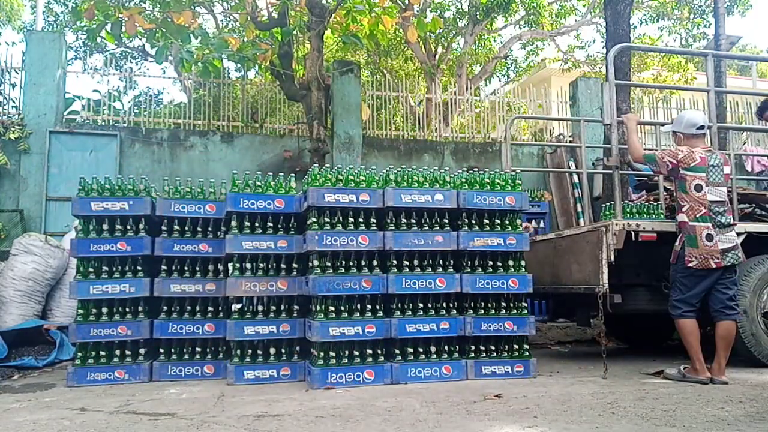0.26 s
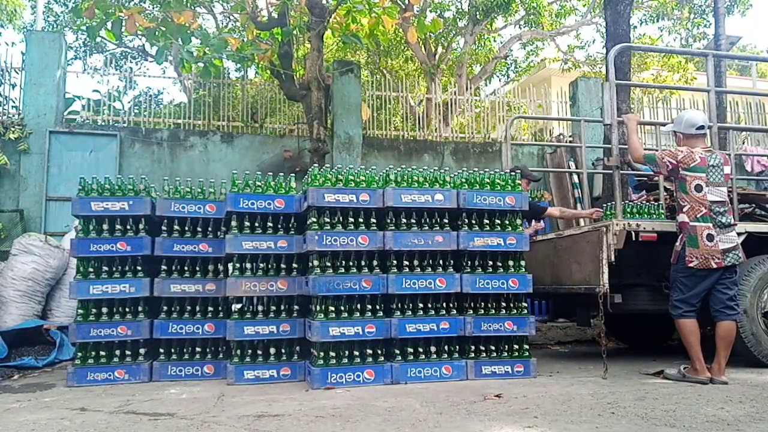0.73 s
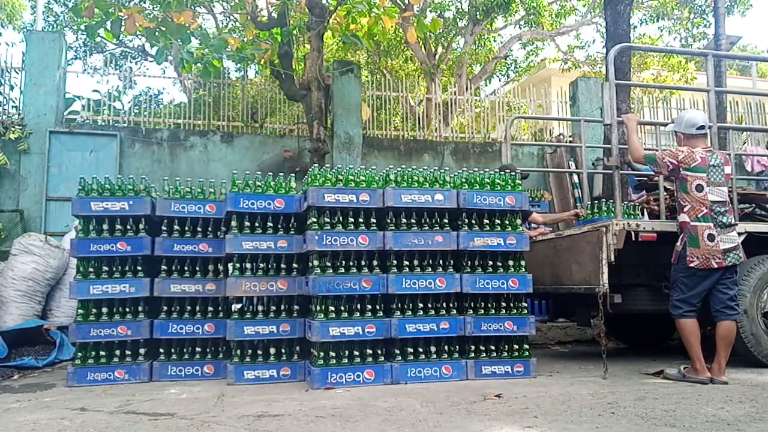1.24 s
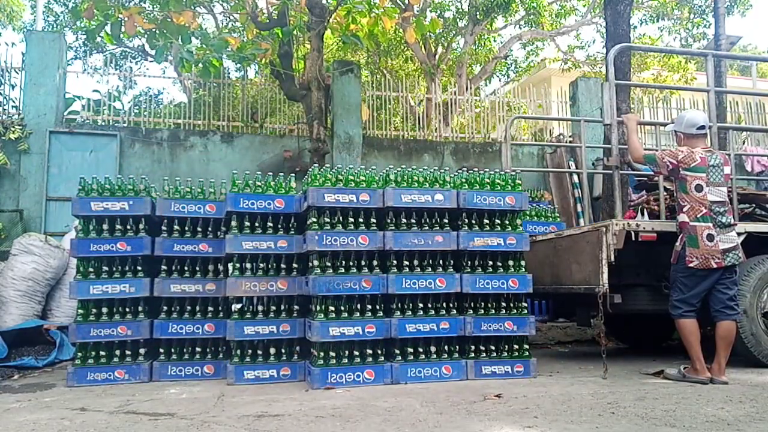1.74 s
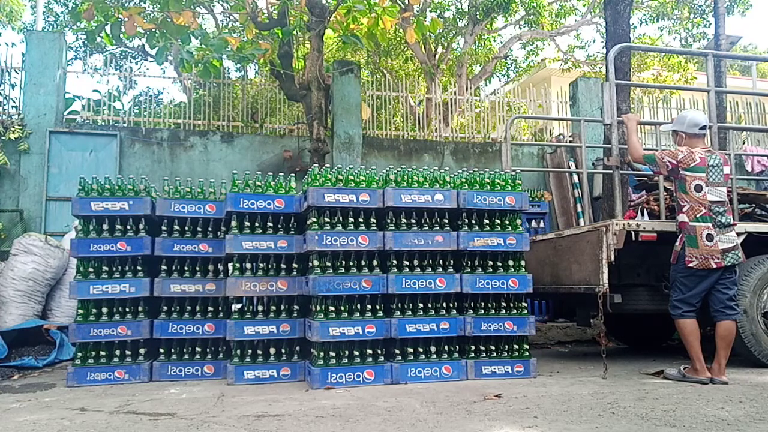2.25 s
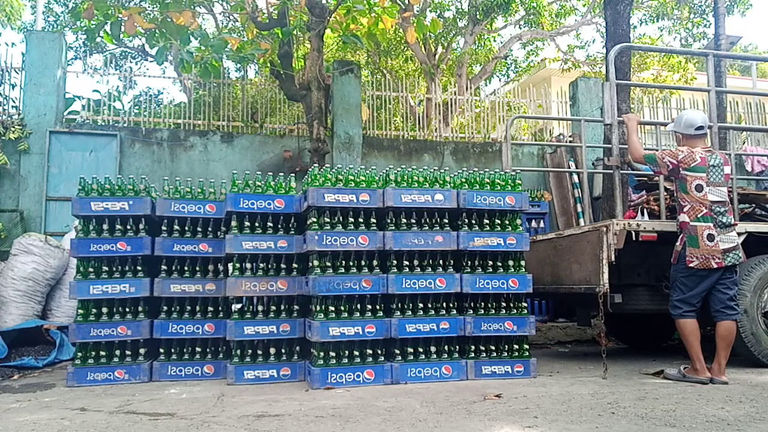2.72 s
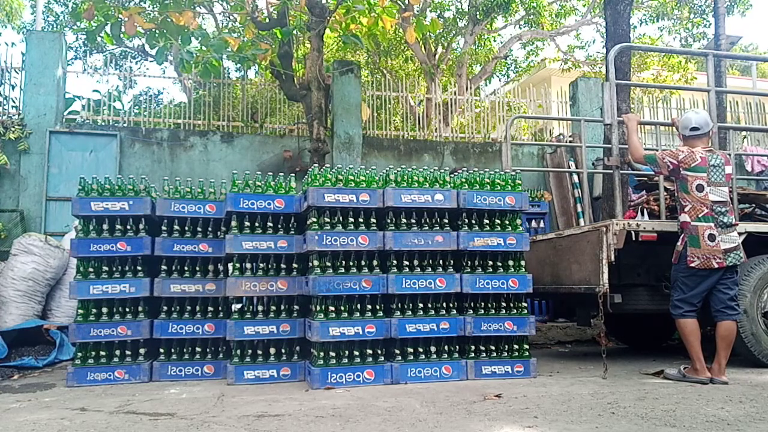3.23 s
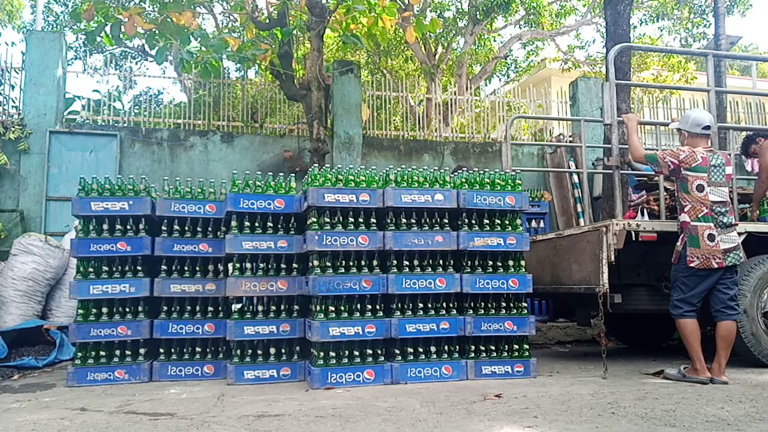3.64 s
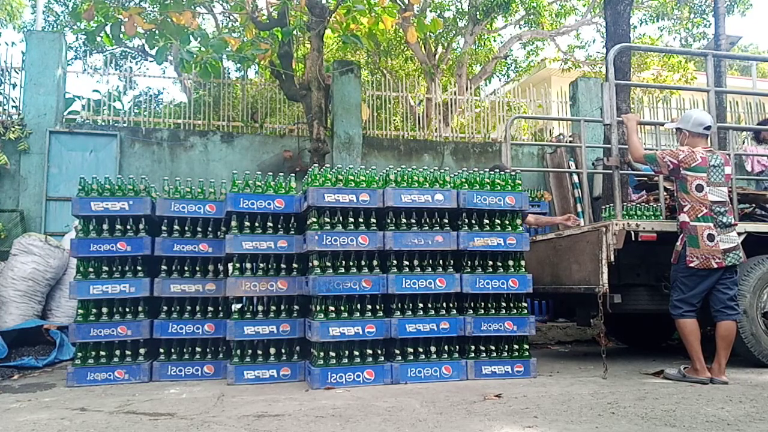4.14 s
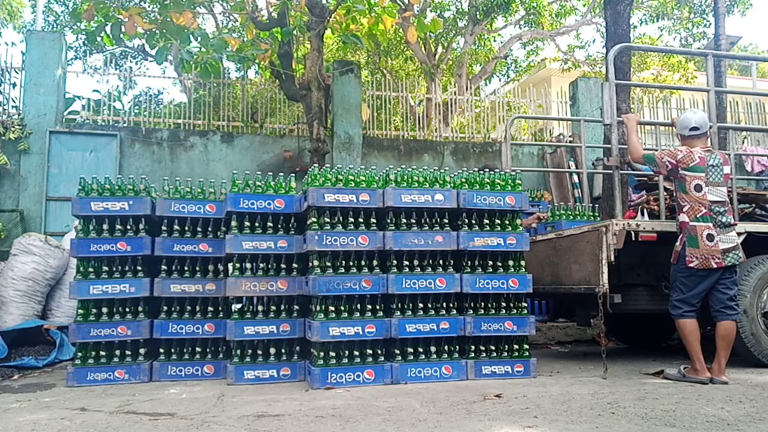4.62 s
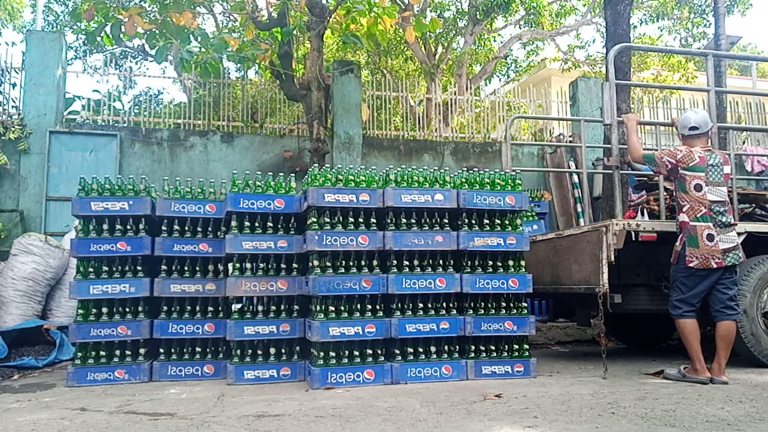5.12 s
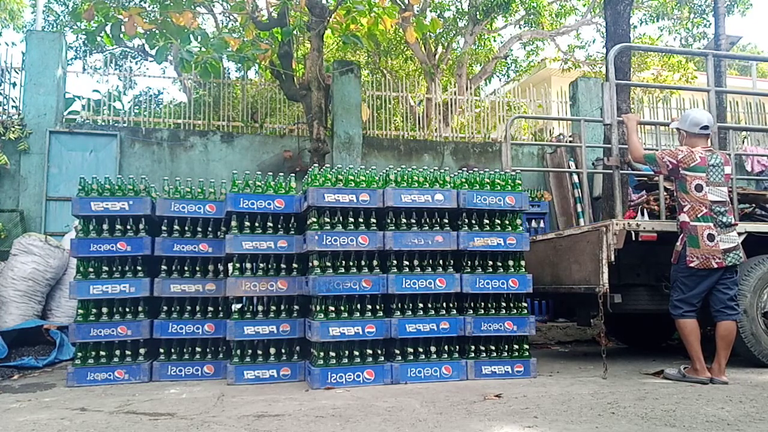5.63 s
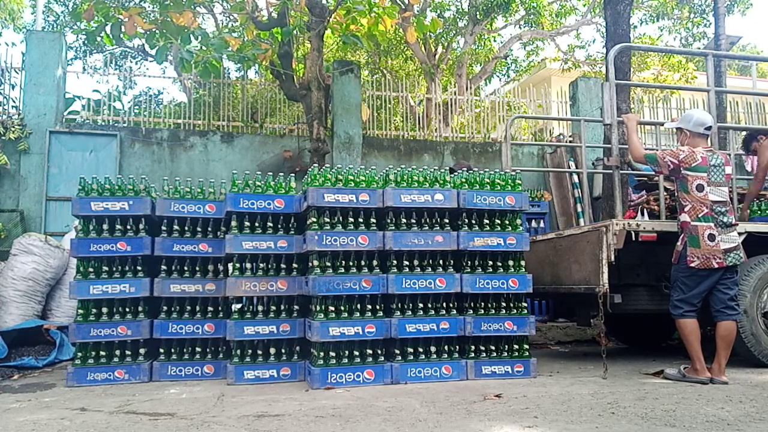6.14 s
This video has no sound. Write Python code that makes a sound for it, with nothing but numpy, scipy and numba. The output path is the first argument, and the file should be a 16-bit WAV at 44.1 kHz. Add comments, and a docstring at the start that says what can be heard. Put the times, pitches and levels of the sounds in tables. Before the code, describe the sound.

Quiet outdoor yard, close phone pickup with thin bass and a short wall reflection. At 0 s a sudden gritty scrape with rattling bottles and a creak fades within half a second. From 0.5 to 1.1 s a slower drag sings and creaks, wavering downward, with small clinks near 0.7 s. A high, rough squeal runs from about 1.45 to 1.8 s, with a crate knock and low boom at 1.67 s. It then becomes quiet, with a soft bump at 2.4 s. At 2.8 s a crate clacks down sharply; a bright glass clink rings at 3.17 s. Around 3.8 to 4.1 s come a deep thud, scraping and a heavy hollow knock, with bed rumble. Singing scraping continues from 4.25 to 5 s with a knock near 4.8 s. Light clinks lead to a loud plastic-and-glass clatter at 5.8 s, a knock at 6 s and a small tap at 6.3 s.

```python
"""Bottle crates on a truck bed

Plastic crates of glass bottles are dragged over a steel truck bed and set down on a stack in a yard.
Grit makes noise that partly sings in resonant bands; random contacts ring modes of bottles, crates and bed.
Stick-slip makes one harmonic squeal and several narrow-band creaks; landings, thuds and single clinks
are excited modes. A short reflection from the yard wall and quiet yard noise surround them.
"""
import sys
import numpy as np
from scipy import signal
from scipy.fft import rfft, irfft, next_fast_len
from scipy.io import wavfile
from scipy.ndimage import uniform_filter1d
from numba import njit

SR = 44100
rng = np.random.default_rng(int(sys.argv[2]) if len(sys.argv) > 2 else 0)


def transcribe(u):
    """Save the signal u as a 16-bit wav file named by the first command-line argument.

    u: samples, shape (n,) or (channels, n), limited to [-1, 1]; the rate is SR.
    q: integer samples, one column per channel.
    """
    v = np.clip(np.atleast_2d(u).T, -1, 1)
    q = np.round(v * 32767).astype(np.int16)
    wavfile.write(sys.argv[1], SR, q)


N = 281056

# modes of a glass bottle: (frequency [Hz], relative level [dB], free decay t60 [s])
BOTTLE_MODES = [(1986, 7.5, 0.057), (2440, -14, 0.071), (2708, -4, 0.042), (2920, -1, 0.1),
                (3173, -7.5, 0.16), (4030, -7, 0.061), (4840, -25, 0.22), (5150, -2, 0.17),
                (6090, -13, 0.12), (6702, -5, 0.14), (8190, -28, 0.1)]
# modes of the crate ribs: (frequency [Hz], relative level [dB], t60 [s])
RIB_MODES = [(1273, 4.7, 0.031), (1405, 3.1, 0.047), (1551, 5.3, 0.039), (1783, 1.4, 0.072),
             (1936, 1.3, 0.038), (2283, 5.1, 0.025)]
# modes of the crate walls: (frequency [Hz], relative level [dB], t60 [s])
WALL_MODES = [(255, -17.5, 0.44), (321.8, -1.5, 0.089), (361.2, 4.5, 0.053), (430, -5.5, 0.06),
              (535.5, -3, 0.063), (616.5, -0.5, 0.046), (724, 0.5, 0.04), (805, 6.5, 0.031),
              (938, -3.5, 0.074), (1079, 11.5, 0.027)]


def undb(db):
    """Amplitude ratio is ten to the power of the level over 20."""
    return 10 ** (np.asarray(db) / 20)


def level(x, db):
    """Scaling by the root mean square sets the mean power."""
    return x * undb(db) / np.sqrt(np.mean(x ** 2))


def curve(table):
    """Linear interpolation of pitch and level; the level sinks to -120 dB just outside the rows."""
    s, hz, db = np.transpose(table)
    t = np.arange(N) / SR
    edged_s = [s[0] - 0.02, *s, s[-1] + 0.013]
    return np.interp(t, s, hz), np.interp(t, edged_s, [-120, *db, -120])


def walk(rate):
    """Low-passed noise: random levels held 1 / rate seconds and smoothed twice; spread near 1.5."""
    k = int(SR / rate)
    held = np.repeat(rng.standard_normal(N // k + 1), k)
    return 2.06 * uniform_filter1d(uniform_filter1d(held, k), k)[:N]


def ring(x, hz, t60):
    """A damped resonator: two poles give one mode, and a unit tick rings with peak near 1."""
    r = np.exp(-np.log(1000) / (t60 * SR))
    w = 2 * np.pi * hz / SR
    return signal.lfilter([0, np.sin(w)], [1, -2 * r * np.cos(w), r * r], x + 1e-18)


def coloured(x, spectrum):
    """Spectral shaping: the transform is weighted by levels interpolated over log frequency."""
    hz, db = np.transpose(spectrum)
    size = next_fast_len(N, True)
    f = np.arange(size // 2 + 1) * SR / size + 1
    gain = undb(np.interp(np.log(f), np.log(hz), db, right=-120))
    return irfft(rfft(x, size) * gain, size)[:N]


def grains(rate, scatter_db):
    """Shot noise: random contacts at a mean rate [1/s], most small and a few large."""
    hit = rng.random(N) < rate / SR
    return hit * rng.standard_normal(N) * undb(scatter_db * rng.exponential(size=N))


@njit
def pings(start, hz, t60, size, rise):
    """Damped modal vibration: each short ring swells over a soft contact and dies away."""
    out = np.zeros(N)
    for k in range(len(start)):
        # one complex turn per sample, with its decay
        p = np.exp(2j * np.pi * hz[k] / SR - np.log(1000) / (t60[k] * SR))
        z, touch = size[k] + 0j, 1.
        for i in range(start[k], min(N, start[k] + int(t60[k] * SR))):
            z *= p
            touch *= rise
            out[i] += z.imag * (1 - touch)
    return out


def shaken(modes, db, scatter_db, detune, contact_s, count, free_hz=None, reach_db=0):
    """Modal excitation: each random contact wakes one detuned mode; modes far from the freest pitch are held."""
    when, which, big, tune = rng.random((count, 4)).T
    hz, mode_db, t60 = np.transpose(modes)[:, (which * len(modes)).astype(int)]
    start = (when * N).astype(np.int64)
    size = undb(mode_db - scatter_db * np.log(1 - 0.97 * big))
    # unit mean power for the whole set of decaying rings
    size = size / np.sqrt(np.sum(size ** 2 * t60) * SR / (4 * np.log(1000) * N))
    if free_hz is not None:
        size = size * undb(-reach_db * np.log2(hz / free_hz[start]) ** 2)
    detuned_hz = hz * (1 + detune * (2 * tune - 1))
    return pings(start, detuned_hz, t60, size * undb(db[start]), np.exp(-1 / (contact_s * SR)))


def yard():
    """Steady broadband noise of the quiet yard, its level wandering slowly."""
    # yard noise: (frequency [Hz], relative spectrum level [dB])
    yard_spectrum = [(18, -52), (30, 7), (98, 4.5), (435, -4), (755, -1), (1150, -5), (1340, -1.5),
                     (2950, -9.5), (8420, -13), (11200, -30.5), (15800, -33)]
    noise = coloured(rng.standard_normal(N), yard_spectrum)
    return level(noise, -63.5) * undb(1.2 * walk(3))


def yard_wall(near):
    """Diffuse reflection: convolution with decaying noise that begins 12 ms after the direct sound."""
    t = np.arange(int(0.25 * SR)) / SR
    response = rng.standard_normal(len(t)) * np.exp(-np.log(1000) * t / 0.11) * (t > 0.012)
    return signal.fftconvolve(near, response / np.sqrt(np.sum(response ** 2)))[:N]


def thuds():
    """Impact on a plate: a heavy load drops onto the bed and one low panel mode booms."""
    # loads dropping on the bed: (time [s], level before the soft contact [dB], pitch [Hz])
    drops = [(1.67, -28, 100.6), (3.8, -32.5, 123), (4.845, -51, 111.6)]
    t60_s, rise_s = 0.62, 0.0066
    s, db, hz = np.transpose(drops)
    return pings((s * SR).astype(np.int64), hz, t60_s + 0 * hz, undb(db), np.exp(-1 / (rise_s * SR)))


def creaks():
    """Stick-slip at a singing pitch: uneven slips, about 100 to 150 a second, modulate two quadratures."""
    # one list per creak of slow rubbing: (time [s], centre [Hz], relative level [dB])
    creak_courses = [
        [(0.0, 1517, -35.5), (0.046, 1560, -38), (0.24, 1551, -48)],
        [(0.36, 1560, -63), (0.396, 1557, -42), (0.474, 1483, -37.5), (0.524, 1403, -42.5), (0.74, 1392, -44),
         (0.85, 1290, -62), (1.02, 1316, -46)],
        [(0.0, 696, -36), (0.126, 682, -43), (0.16, 770, -68)],
        [(0.55, 1090, -53), (0.736, 1002, -37), (0.89, 906, -47.5), (0.946, 1020, -36.5), (1.05, 1053, -63)],
        [(0.64, 1845, -38.5), (0.78, 1876, -41), (0.96, 1900, -44)],
        [(0.78, 651, -52), (0.88, 571, -45.5), (0.9, 584, -47)],
        [(1.68, 348.6, -37), (1.85, 332.6, -44.5), (1.93, 307, -67)],
        [(4.8, 717, -56), (4.87, 714, -45.5), (4.96, 740, -63)],
    ]
    out = 0
    for course in creak_courses:
        hz, db = curve(course)
        phase = 2 * np.pi * np.cumsum(hz) / SR
        slip_rate = 90 + hz.mean() / 30
        burst = walk(slip_rate) * np.sin(phase) + walk(slip_rate) * np.cos(phase)
        out = out + undb(db - 8.0) * burst
    return out


def squeal():
    """Periodic stick-slip of a crate foot on steel: a faltering grip makes harmonics flutter and roughen."""
    # the squeal: (time [s], pitch [Hz], relative level [dB])
    squeal_course = [(1.44, 2050, -71), (1.49, 2090, -29), (1.57, 2031, -30), (1.62, 2070, -32.5),
                     (1.66, 2127, -31), (1.71, 2114, -39.5), (1.8, 2075, -52.5), (1.86, 2040, -79)]
    # its harmonics: (multiple of the pitch [1], relative level [dB])
    harmonics = [(1, -0.5), (2, -3.5), (3, -12), (4, -17), (5, -32)]
    hz, db = curve(squeal_course)
    phase = 2 * np.pi * np.cumsum(hz * (1 + 0.0055 * walk(500))) / SR
    fringe = walk(900) + 1j * walk(900)
    tone = 0
    for k, harmonic_db in harmonics:
        slow_flutter = walk(90 * k) + 1j * walk(90 * k)
        flutter = 0.7 + 0.42 * slow_flutter + 0.08 * (k + 1) * fringe
        tone = tone + undb(harmonic_db) * np.imag(flutter * np.exp(1j * k * phase))
    return np.sqrt(2) * tone * undb(db)


def clinks():
    """Impact of glass on glass: a touch and its chatter drive the modes that the place of contact favours."""
    # single clinks: (time [s], peak [dB], loudest region [Hz], reach [octaves], chatter [s])
    touches = [(0.538, -52, 3120, 0.11, 0.017), (.675, -31.5, 2170, 0.17, 0.035),
               (.748, -34, 5500, 1.3, .01), (3.069, -48, 3270, 0.096, 0.1),
               (3.168, -18.5, 3750, 0.89, 0.035), (3.275, -39, 3660, 0.92, .04),
               (4.492, -42, 2720, 0.084, 0.036), (4.726, -40, 3120, 0.12, 0.092),
               (5.046, -39.5, 2700, 0.052, 0.04), (5.23, -43, 3200, 0.068, 0.023),
               (5.36, -49, 3180, 0.084, 0.17), (5.569, -45.5, 3100, .1, 0.039),
               (5.852, -22.5, 3160, 0.089, 0.2)]
    t = np.arange(int(0.4 * SR)) / SR
    out = np.zeros(N + len(t))
    for s, db, hz, reach, chatter in touches:
        push = np.exp(-(t / max(chatter, 0.002)) ** 2) * rng.standard_normal(len(t))
        push[0] = 1.3 * np.sqrt(np.sum(push ** 2))  # the first clear touch
        tone = 0
        for f, mode_db, t60 in BOTTLE_MODES:
            favour = np.exp(-(np.log2(f / hz) / reach) ** 2)
            tone = tone + undb(mode_db) * favour * ring(push, f, t60)
        i = int(s * SR)
        out[i:i + len(t)] += undb(db) * tone / np.abs(tone).max()
    return out[:N]


def blows():
    """Impact of a crate: a burst of contacts drives modes near the freest pitch, with a crack of treble."""
    # landings and knocks: (time [s], peak of the modes [dB], focus [dB per squared octave],
    # treble crack over that peak [dB], freest pitch [Hz])
    landings = [(1.662, -26.5, 12, -12, 533), (2.416, -38, 38, -24, 716), (2.762, -38.5, 13, -9, 373),
                (2.813, -27.5, 7, 6, 423), (3.052, -35, 21, -31, 423), (3.768, -47.5, 15, -21, 560),
                (3.848, -39.5, 8, -7, 585), (4.029, -21.5, 6, -17, 337), (4.785, -35, 68, -22, 1420),
                (5.69, -49, 98, -5, 1400), (5.812, -27.5, 13, 8.5, 1550), (5.998, -29.5, 24, -32, 1120),
                (6.317, -34, 40, -20, 950)]
    burst_t60_s, burst_rise_s = 0.17, 0.007
    t = np.arange(int(0.5 * SR)) / SR
    out = np.zeros(N + len(t))
    fall = np.exp(-np.log(1000) * t / burst_t60_s) * np.minimum(t / burst_rise_s, 1)
    treble = signal.butter(2, [1800, 7500], "band", fs=SR)
    for s, db, focus_db, crack_db, hz in landings:
        push = fall * rng.standard_normal((2, len(t)))
        body = 0
        for f, mode_db, t60 in WALL_MODES + RIB_MODES:
            body = body + undb(mode_db - focus_db * np.log2(f / hz) ** 2) * ring(push[0], f, t60)
        crack = signal.lfilter(*treble, push[1])
        hit = body / np.abs(body).max() + undb(crack_db) * crack / np.abs(crack).max()
        i = int(s * SR)
        out[i:i + len(t)] += undb(db) * hit
    return out[:N]


def swells(rows):
    """Exponential growth and decay: each power envelope rises, holds and fades straight in dB."""
    swing_db = 30  # climb in one swell time, or fall in one fade time
    t = np.arange(0, N, 32) / SR
    s, swell, hold, fade = np.array(rows)[:, :4, None].transpose(1, 0, 2)
    drop = np.maximum(np.maximum((s - t) / swell, (t - s - np.abs(hold)) / fade), 0)
    return undb(-2 * swing_db * drop)


def summed_db(shapes, db):
    """Incoherent addition: the powers of overlapping events sum at every sample."""
    power = undb(2 * np.asarray(db)) @ shapes + 1e-12
    return np.repeat(10 * np.log10(power), 32)[:N]


def freest(shapes, db, hz):
    """Power-weighted mean: the loudest event dominates the freest pitch at every sample."""
    weight = undb(2 * db)[:, None] * shapes + 1e-30
    return np.repeat(hz @ weight / weight.sum(axis=0), 32)[:N]


def shaking():
    """Common excitation by shoves and shifting weight: levels of all parts, freest pitches of walls and bed."""
    # crates shoved, dragged or jolted: (time of full strength [s], swell [s], hold [s], fade [s],
    # bottles [relative dB], finest grit over bottles [dB], ribs [relative dB], walls [relative dB],
    # freest wall pitch [Hz])
    shoves = [(0.0, 0.0056, 0.0068, 0.45, -39.5, -17, -30.5, -39, 800),
              (0.456, 0.39, 0.19, 0.22, -53.5, -7, -37.5, -49.5, 910),
              (0.685, 0.044, 0.15, 0.31, -40, -6.5, -32.5, -38, 990),
              (1.142, 0.11, 0.37, 0.23, -57.5, -6, -48.5, -62, 700),
              (1.483, 0.11, 0.17, 0.12, -40.5, -20, -65, -77, 770),
              (1.661, 0.033, 0.042, 0.29, -42, -15, -40.5, -35.5, 494),
              (1.904, 0.48, 0.5, 0.19, -67, -1, -52.5, -68, 527),
              (2.396, 0.089, 0.023, 0.14, -65, -15, -44, -37, 385),
              (2.808, 0.0073, 0.02, 0.05, -35.5, -14, -25.5, -15, 530),
              (2.822, 0.037, 0.093, 0.2, -37, -13, -30.5, -23.5, 594),
              (3.055, 0.035, 0.21, 0.27, -58.5, -25, -38, -36.5, 523),
              (3.176, 0.062, 0.006, 0.17, -34, -30, -35, -33, 690),
              (3.473, 0.45, 0.026, 0.13, -73, -16, -49.5, -48, 367),
              (3.851, 0.047, 0.1, 0.19, -50.5, 0, -37, -32.5, 537),
              (3.944, 0.17, 0.36, 0.12, -42.5, -10.5, -46, -68, 440),
              (3.955, 0.14, 0.1, 0.25, -51.5, 7, -34.5, -26, 445),
              (4.283, 0.025, 0.093, 0.2, -48.5, -24, -49, -39, 318),
              (4.51, 0.57, 0.3, 0.21, -49, -12, -44.5, -51.5, 950),
              (4.792, 0.029, 0.031, 0.25, -50, -17, -35.5, -42, 620),
              (5.055, 0.084, .01, 0.15, -51.5, -19, -48.5, -51, 387),
              (5.278, 0.27, 0.26, 0.19, -53, -8, -43.5, -38.5, 577),
              (5.808, 0.0059, 0.0076, 0.098, -38.5, -26, -17, -16.5, 700),
              (5.836, 0.017, 0.024, 0.18, -30.5, -11, -26.5, -27.5, 656),
              (5.928, 0.03, 0.12, 0.15, -38, -23, -29, -29, 630),
              (6.343, 0.12, .03, 0.11, -52.5, -15, -34.5, -35.5, 950)]
    # bed under shifting weight: (time of full strength [s], swell [s], hold [s], fade [s],
    # relative level [dB], freest pitch [Hz])
    rumbles = [(1.186, 0.62, 0.054, 0.088, -55.5, 105), (1.44, 0.08, 0.023, 0.065, -49.5, 149),
               (1.676, .02, 0.052, 0.41, -35, 150), (2.393, 0.66, 0.11, 0.16, -52.5, 92),
               (2.816, 0.069, 0.44, 0.23, -46.5, 135), (3.147, 0.4, 0.16, 0.17, -43, 91),
               (3.467, 0.1, 0.062, 0.072, -42, 114), (3.797, 0.061, 0.024, 0.3, -31, 122),
               (3.969, 0.2, 0.082, 0.29, -27, 139.5), (4.372, 0.15, 0.044, 0.19, -34.5, 197),
               (4.855, 0.079, 0.011, 0.077, -32.5, 114), (5.108, 0.2, 0.034, 0.35, -41.5, 122),
               (6.214, 0.067, 0.17, 0.13, -42, 131)]
    shove_shapes, rumble_shapes = swells(shoves), swells(rumbles)
    bottles, dust, ribs, walls, walls_hz = np.transpose(shoves)[4:]
    bed, bed_hz = np.transpose(rumbles)[4:]
    levels = [summed_db(shove_shapes, db) for db in (bottles, bottles + dust, ribs, walls)]
    free_walls_hz = freest(shove_shapes, walls, walls_hz)
    return *levels, free_walls_hz, summed_db(rumble_shapes, bed), freest(rumble_shapes, bed, bed_hz)


def singing():
    """Frictional coupling: slow sliding draws more of the grit's power into the loaded crate's bands."""
    # slow slides: (start [s], end [s])
    slow_slides = [(.6, 1.1), (4.25, 5.0)]
    fast_share, slow_share, blend_s = 0.25, 0.9, 0.25  # shares of the power, 0-1
    t = np.arange(N) / SR
    slow = sum(1. * (t > a) * (t < b) for a, b in slow_slides)
    blend = np.clip(uniform_filter1d(slow, int(blend_s * SR)), 0, 1)
    return fast_share + (slow_share - fast_share) * blend


def dry_grit():
    """Shot noise of dry scraping: low, middle and high bands come and go on their own."""
    # scraping noise: (frequency [Hz], relative spectrum level [dB])
    grit_spectrum = [(1000, -40), (1590, 0), (2720, -1.5), (3210, 6), (3570, 2), (6480, 1.5), (8910, -8.5),
                     (10000, -16.5), (13000, -26), (22000, -120)]
    grit = coloured(grains(9000, 0.24), grit_spectrum)
    low = signal.sosfilt(signal.butter(2, 3000, "low", fs=SR, output="sos"), grit)
    top = signal.sosfilt(signal.butter(2, 6000, "high", fs=SR, output="sos"), grit)
    middle = grit - low - top
    return level(sum(band * undb(2.2 * walk(14)) for band in (low, middle, top)), -1.0)


def finest_grit():
    """Shot noise of the finest grit: more widely scattered contacts with a wandering level."""
    # finest grit: (frequency [Hz], relative spectrum level [dB])
    fine_spectrum = [(5590, 11), (9500, 10), (9930, 0.5), (10900, -2.5), (13500, -39), (14900, 6.5),
                     (15800, -7)]
    return level(coloured(grains(9000, 1.4), fine_spectrum) * undb(2.8 * walk(14)), 0)


def singing_bands():
    """Resonance under friction: slip noise drives two fluctuating strands in each band of the loaded crate."""
    # loaded crate: (centre [Hz], nominal width [Hz], level before compression by 0.76 [dB])
    loaded_bands = [(1409, 54, -3), (1907, 90, -8.5), (2320, 110, 5.5), (2870, 520, 4), (3203, 100, -6),
                    (3630, 190, 4.5), (4340, 99, -16), (5814, 80, 1), (6550, 20, -6.5)]
    slip = rng.standard_normal(N)
    strands = 0
    for centre, width, db in loaded_bands:
        for hz in (centre - 0.5 * width, centre + 0.91 * width):
            strand = level(ring(slip, hz, 5.3 / max(width, 60)), 0.76 * db)
            strands = strands + strand * (1 + np.tanh(9.8 * walk(14)))
    return level(strands, -2.8)


def drag():
    """Friction and modal excitation: grit, bottles, ribs, walls and bed sound under the shaking."""
    # modes of the steel bed: (frequency [Hz], relative level [dB], t60 [s])
    bed_modes = [(80.8, -4.5, 0.3), (106.2, -1, 0.094), (121.3, -6, 0.18), (167, -10, 0.22),
                 (204.7, -6.5, 0.16)]
    bottles_db, dust_db, ribs_db, walls_db, walls_hz, bed_db, bed_hz = shaking()
    share = singing()
    rub = np.sqrt(1 - share) * dry_grit() + np.sqrt(share) * singing_bands()
    # packed bottles damp one another, so all their modes ring for one time and at more even levels
    packed = [(hz, 0.094 * db - 0.28 * np.log2(hz / 3000) ** 2, 0.11) for hz, db, _ in BOTTLE_MODES]
    rattle = shaken(packed, bottles_db - 3.5, 2.3, 0.08, 0.0015, count=4000)
    ribs = shaken(RIB_MODES, ribs_db - 6.0, 0.27, 0.0665, 0.0038, count=2500)
    walls = shaken(WALL_MODES, walls_db + 2.5, 1.16, 0.068, 0.0055, count=3500,
                   free_hz=walls_hz, reach_db=9.5)
    bed = shaken(bed_modes, bed_db - 1.0, 0.51, 0.076, 0.0037, count=1400,
                 free_hz=bed_hz, reach_db=23.5)
    return rub * undb(bottles_db) + finest_grit() * undb(dust_db) + rattle + ribs + walls + bed


def scene():
    """Superposition of all sources, their reflection from the yard wall and the quiet yard."""
    near = thuds() + creaks() + squeal() + clinks() + blows() + drag()
    return (near + undb(-12) * yard_wall(near) + yard())[None]


def record(dry):
    """Transduction by a phone: a bass cut, port resonance, soft saturation of peaks and a steep top cut."""
    dry = signal.sosfilt(signal.butter(2, 75, "high", fs=SR, output="sos"), dry)
    port = signal.lfilter(*signal.iirpeak(15200, 9., fs=SR), dry)
    rounded = np.tanh(2.5 * (dry + undb(-5.0) * port)) / 2.2
    return signal.sosfilt(signal.ellip(10, 0.2, 80, 15720, fs=SR, output="sos"), rounded)


dry = scene()
out = record(dry)
transcribe(out)
```